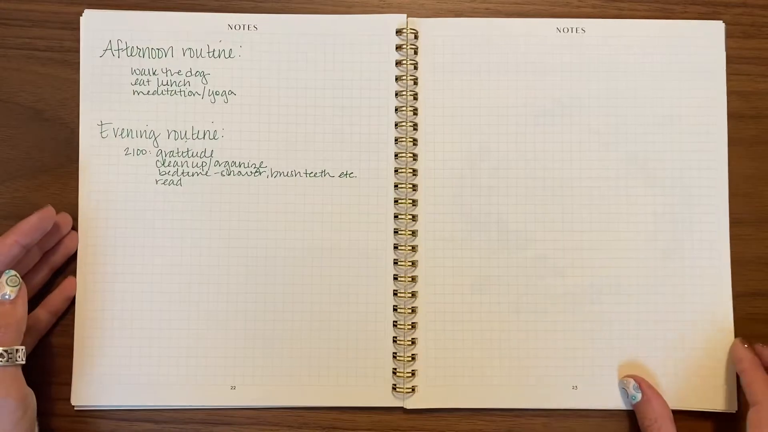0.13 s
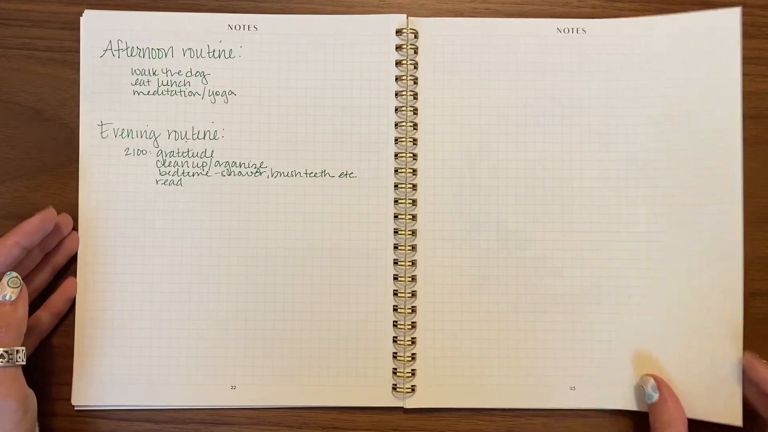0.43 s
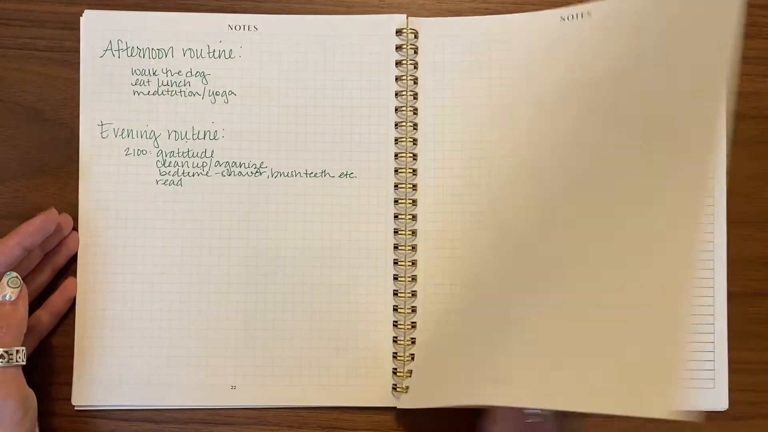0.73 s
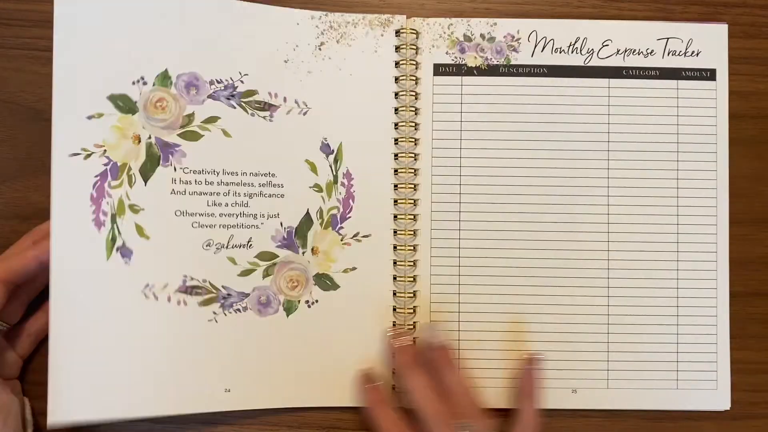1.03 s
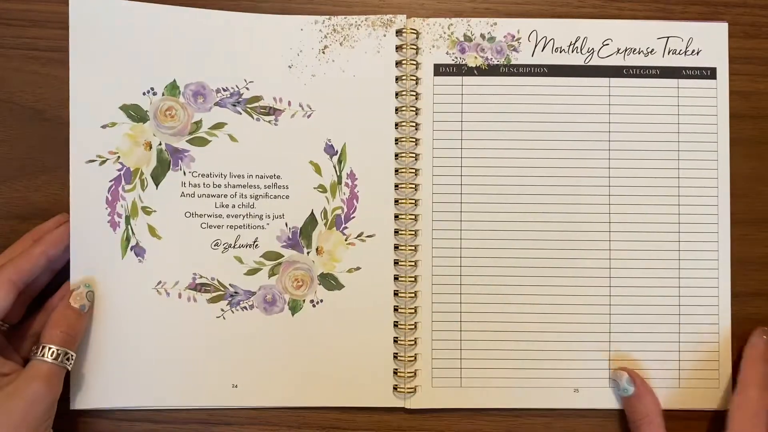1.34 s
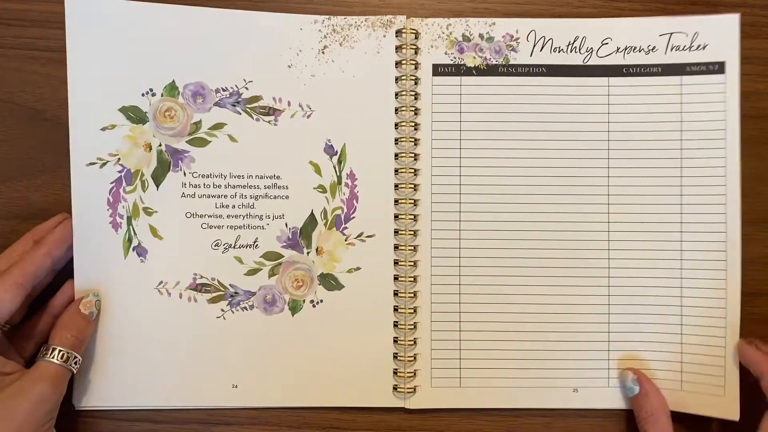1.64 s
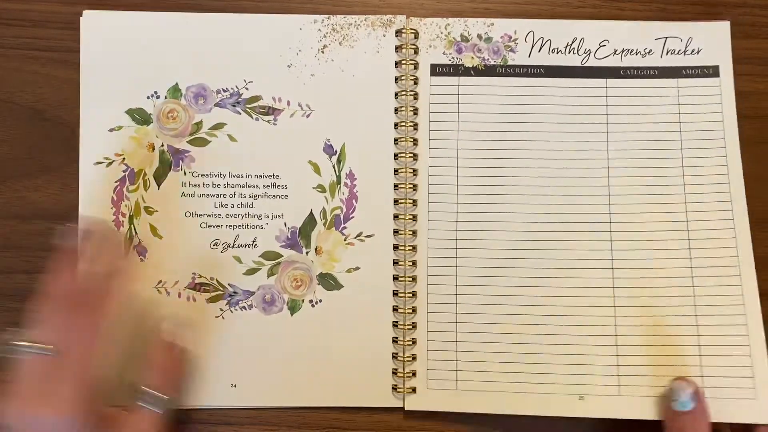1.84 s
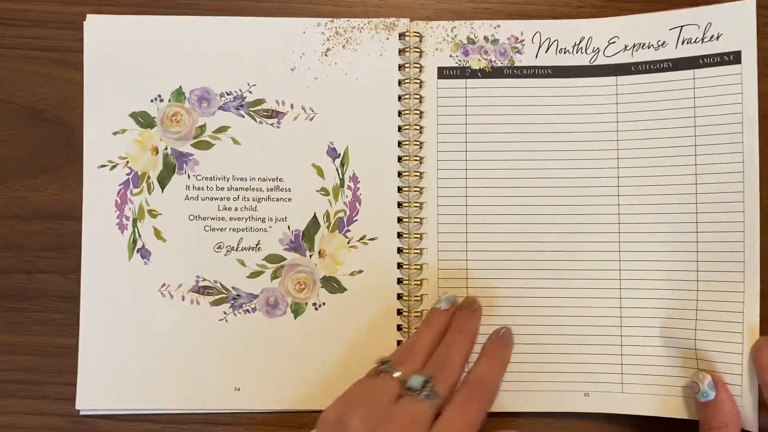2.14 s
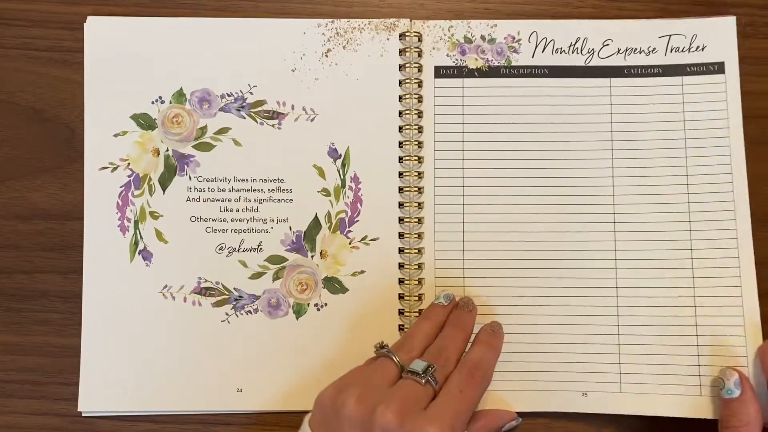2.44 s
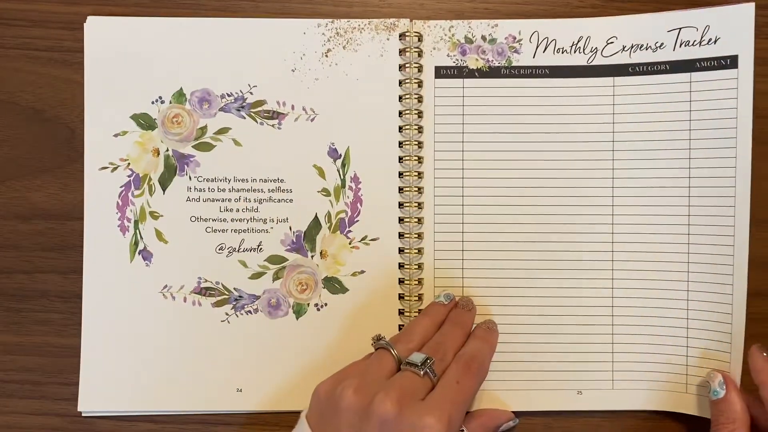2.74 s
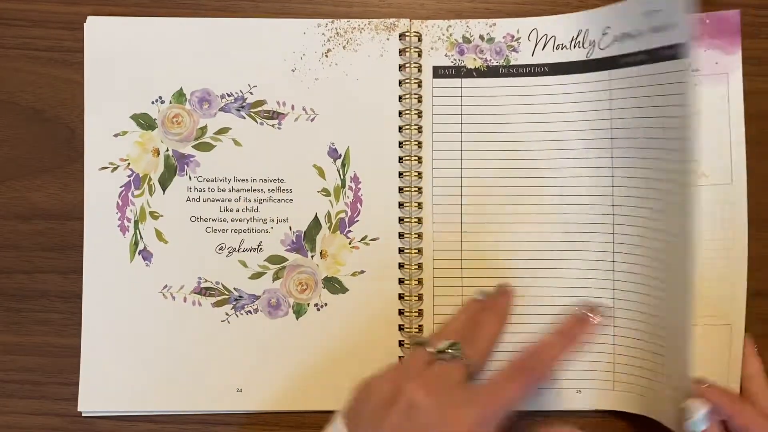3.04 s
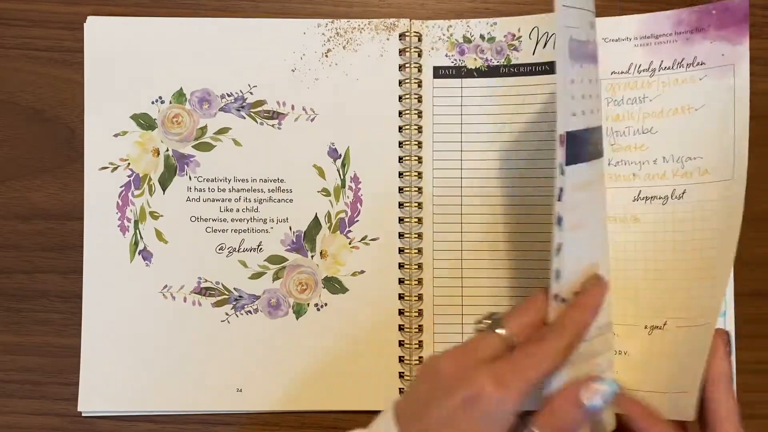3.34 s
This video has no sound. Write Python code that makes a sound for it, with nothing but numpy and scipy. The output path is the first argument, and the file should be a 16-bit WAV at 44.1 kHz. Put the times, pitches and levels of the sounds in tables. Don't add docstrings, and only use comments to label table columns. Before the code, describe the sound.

Notebook pages turned by hand, soft papery rustle and sliding fingers, ending in sharp hard flicks

```python
import sys
import numpy as np
from scipy import signal
from scipy.fft import rfft, irfft, next_fast_len
from scipy.io import wavfile
from scipy.ndimage import uniform_filter1d, map_coordinates

SR = 44100
rng = np.random.default_rng(int(sys.argv[2]) if len(sys.argv) > 2 else 0)


def how_loud(loudness_db):
    steps = np.asarray(loudness_db, float) / 20
    return 10 ** steps


def waveform_to_disk(signal):
    frames = np.transpose(np.atleast_2d(signal))
    scaled = np.clip(frames, -1, 1) * 32767
    samples = np.round(scaled).astype(np.int16)
    wavfile.write(sys.argv[1], SR, samples)


N = 154350

# f/Hz, level/dB per Hz
HUM_COLOUR = [(22, -25), (42, -2), (200, -3), (450, -5.5), (900, -17.5), (1300, -18), (1900, -45),
              (16000, -50)]
# f/Hz, width/Hz, level/dB
DRONES = [(43.7, 22, 3), (125, 21.5, 1), (178.6, 26, 5), (247.3, 6.6, 14.5), (313, 19.4, 1.5),
          (366.6, 21, -4), (8270, 140, 29.5)]
# f/Hz, correlation/1
HUM_LIKENESS = [(60, 0.25), (200, 0.93), (500, 0.17), (1500, 0.09), (8000, 0.33)]
# f/Hz, t60/s
WALL_DECAY = [(300, 0.24), (2000, 0.15), (6000, 0.25), (14000, 0.2)]
# t/s, level/dB, f/Hz, t60/s
THUDS = [
    (0.404, -36.5, 125, 0.093),
    (0.623, -31, 154, 0.087),
    (0.831, -37.5, 123, 0.19),
    (1.531, -45.5, 122.3, 0.39),
    (1.673, -31, 117, 0.078),
    (1.781, -46.5, 129, 0.51),
    (2.53, -38, 91, 0.069),
]
# t/s, rms level/dB, centre f/Hz, length/s
SCRAPES = [(0.38, -41.5, 4800, 0.017), (1.138, -48, 4800, 0.0058), (1.848, -40, 4800, 0.021),
           (2.736, -48, 4800, 0.15), (2.75, -48, 2100, 0.33), (2.861, -35, 3040, 0.028),
           (1.6, -66, 4900, .06), (1.1, -45.5, 4800, 0.049), (1.08, -56.5, 11200, .2),
           (2.849, -42, 2500, 0.01), (2.853, -38, 5560, .008), (1.3, -49, 9900, 0.015),
           (0.78, -55, 5900, 0.014), (.868, -51, 1120, 0.022), (1, -47, 2500, .016),
           (2.685, -65, 2100, 0.037)]
# t/s, level/dB, f/Hz, t60/s
RINGS = [(0.402, -32, 1710, 0.0075), (0.4047, -35, 930, .015), (0.41, -36, 1300, 0.0098),
         (.414, -30, 986, 0.015), (.924, -26, 830, 0.012), (0.9261, -30.5, 1560, 0.012),
         (1.6765, -32.5, 1360, 0.016), (1.678, -27.5, 1106, 0.0093), (1.6968, -35, 1170, 0.017),
         (2.525, -35, 1230, 0.0088), (2.529, -34.5, 856.2, 0.01), (2.5294, -32, 1560, 0.0088),
         (1.018, -45, 1900, 0.0094), (0.6282, -26, 1010, 0.0069), (0.633, -30.5, 1400, 0.0074),
         (.6355, -26, 770, 0.013), (0.6413, -28, 940, 0.0084), (0.647, -34, 990, 0.024),
         (0.812, -36, 3290, 0.0086), (1.0414, -14.5, 2530, 0.004), (1.041, -27, 5770, 0.0091),
         (1.0422, -36.5, 4740, .015), (1.0431, -32, 1480, 0.018), (1.047, -27.5, 1130, 0.01),
         (1.051, -36, 1110, 0.016), (1.054, -38, 684, 0.051), (2.8646, -13.5, 1720, 0.007),
         (2.8648, -13.5, 2190, 0.0046), (2.864, -24.5, 4720, 0.0094), (2.8654, -26.5, 5900, 0.0084),
         (2.869, -33.5, 2770, 0.022), (2.876, -37, 2160, 0.014), (2.937, -23.5, 1210, 0.0051),
         (2.945, -32.5, 1470, 0.017), (2.8645, -31.5, 832, 0.015), (1.684, -37, 864, 0.022),
         (3.1477, -4.5, 1940, 0.0069), (3.148, -16, 1085, 0.023), (3.1479, -8.5, 3820, 0.0071),
         (3.1474, -6.5, 5250, 0.0056), (3.1485, -8, 6315, 0.0077), (3.1563, -27, 2866, 0.045),
         (3.1564, -21, 5500, 0.014), (3.25, -39.5, 1040, 0.015), (3.2865, -26.5, 2060, .018),
         (3.292, -17, 2080, 0.006), (3.2918, -29, 1020, 0.011), (3.3025, -28, 880, 0.009)]
# crest t/s, peak level/dB (the puff peaks 7 dB
# higher), centre f/Hz, length/s
FLAPS = [(0.407, -37.5, 1290, 0.012), (0.433, -51.5, 696, 0.011), (0.574, -49, 1300, 0.04),
         (0.631, -40.5, 870, 0.011), (0.828, -40, 1100, 0.0064), (.875, -46, 690, 0.037),
         (0.889, -38, 980, 0.021), (0.928, -33.5, 900, 0.0073), (.945, -41.5, 850, 0.0094),
         (1.046, -36, 1050, 0.017), (1.06, -61, 970, 0.0057), (1.206, -53.5, 1810, 0.028),
         (1.68, -40.5, 1200, 0.018), (1.697, -40.5, 930, 0.0079), (2.02, -48.5, 910, 0.0096),
         (2.21, -49.5, 1160, 0.0064), (2.534, -41, 920, 0.0069), (2.939, -43, 1210, 0.006),
         (3.244, -48, 1320, 0.0066), (3.279, -35.5, 814.3, 0.014), (3.297, -32, 1120, 0.0035),
         (3.298, -33.5, 670, 0.0053), (2.797, -43, 2270, 0.28), (3.158, -42, 423, 0.013),
         (0.87, -39.5, 410, 0.051), (0.753, -45, 2180, 0.023)]
# t/s, skin hiss level/dB, sheet stir level/dB
SLIDE = [(0, -108, -75), (0.298, -84, -77), (0.346, -52.5, -57), (.6, -54.5, -62), (0.759, -58, -50.5),
         (.945, -53.5, -54), (.985, -66, -71), (1.06, -67, -72), (1.25, -52.5, -56.5), (1.42, -65.5, -67.5),
         (1.57, -73.5, -74.5), (1.601, -51, -63.5), (2.15, -54.5, -52), (2.448, -76.5, -61.5),
         (2.65, -65.5, -66.5), (2.76, -45.5, -59), (3.1, -54.5, -51.5), (3.45, -94, -55)]
# f/Hz, level/dB per Hz
SKIN_COLOUR = [(800, -31), (1500, -32.5), (3000, -11.5), (4300, -8.5), (6500, -8.5), (8500, -14.5),
               (12500, -12.5), (16000, -15)]
# f/Hz, level/dB
SHEET_COLOUR = [(250, -46), (500, -10), (900, -1), (2000, 0.5), (3500, -3.5), (7000, -9.5), (15000, -20)]
# t/s, peak level/dB, t60/s, treble level/dB
FLICKS = [(0.125, -35, 0.029, 8), (.347, -35, 0.081, -3), (0.389, -32, 0.19, 10), (0.549, -44.5, 0.25, 16),
          (1.195, -35.5, 0.14, 21), (1.912, -34.5, 0.11, 19), (2.3, -36.5, 0.23, 3), (2.506, -38, 0.31, 24),
          (0.6236, -27.5, 0.018, 16), (.811, -33, 0.068, -18), (.91, -33.5, 0.016, 4),
          (1.018, -39.5, 0.078, -8), (1.0414, -20.5, 0.017, 16), (1.136, -34.5, 0.044, 7),
          (1.388, -40.5, 0.063, 30), (1.592, -37, 0.48, 1), (1.67, -31.5, 0.075, 16),
          (1.849, -38, 0.51, 13), (2.2, -35.5, 0.1, 20), (2.289, -29, 0.022, -4), (2.365, -37, 0.11, 15),
          (2.8644, -14, 0.015, -4), (2.9334, -21, 0.045, -4), (2.9587, -21.5, 0.024, 14),
          (3.1474, -9.5, 0.027, 17), (3.154, -18, 0.1, -8), (.874, -38, 0.012, 14),
          (3.249, -27.5, 0.038, -2), (3.2856, -21, 0.018, 12)]
# f/Hz, width/Hz, level/dB
CORNER_MODES = [(1080, 270, 4.5), (2090, 310, 1), (2440, 430, -13), (3745, 310, 0), (5000, 810, -9),
                (5990, 520, -1), (7340, 410, 3), (8300, 730, -24), (11600, 500, -15)]
# f/Hz, phase/rad
PORT_LEAD = [(0, 0), (1700, 0), (2750, 1.4), (3300, 1), (4200, 1.5), (5100, .15), (6950, 2.95),
             (8000, 3.35), (9700, 6.1), (11000, 6.45), (12950, 9.25), (14200, 9.6), (15500, 11.8)]


def unit(x):
    return x / np.sqrt(np.mean(x ** 2) + 1e-20)


def along(points, hz):
    f, v = np.transpose(points)
    return np.interp(np.log(hz + 1), np.log(f + 1), v)


def wobble(rate):
    knots = rng.standard_normal(int(N * rate / SR) + 4)
    return map_coordinates(knots, [np.arange(N) * rate / SR])


def filtered(x, response):
    n = x.shape[-1]
    m = next_fast_len(n + 8192)
    return irfft(rfft(x, m) * response(np.fft.rfftfreq(m, 1 / SR)), m)[..., :n]


def peak(f, hz, width):
    return 1j * f * width / (hz * hz - f * f + 1j * f * width)


def add(into, x, s):
    part = into[max(round(s * SR), 0):][:len(x)]
    part += x[:len(part)]


def hum():
    def colour(f):
        drones = sum(how_loud(db) * abs(peak(f, hz, width)) ** 2 for hz, width, db in DRONES)
        return how_loud(along(HUM_COLOUR, f)) * (1 + drones)

    def spread(f):
        angle = np.arccos(np.clip(along(HUM_LIKENESS, f), -1, 1)) / 2
        return colour(f) * np.array([np.cos(angle), np.sin(angle)])

    mid, side = filtered(rng.standard_normal((2, N)), spread)
    return how_loud(-47.5 + 1.25 * wobble(4.75)) * unit(np.array([mid + side, mid - side]))


def walls(x):
    overhead_db, sides_db, delay_s = -13, -6.5, 0.007
    hz, t, z = signal.stft(rng.standard_normal((3, SR // 2)), SR, nperseg=256)
    decay = how_loud(-60 * t / along(WALL_DECAY, hz)[:, None])
    tail = signal.istft(z * decay, SR, nperseg=256)[1]
    tail = tail / np.linalg.norm(tail[0])
    late = np.pad(x, (round(delay_s * SR), 0))
    wet = signal.fftconvolve(late[None], tail, axes=1)[:, :N]
    return how_loud(overhead_db) * wet[0] + how_loud(sides_db) * wet[1:]


def ringing(events, length, rise_s, gain):
    out, t = np.zeros(N), np.arange(length) / SR
    for s, db, hz, t60 in events:
        envelope = how_loud(db - 60 * t / t60) * (1 - np.exp(-t / rise_s))
        add(out, gain * envelope * np.sin(2 * np.pi * hz * t), s)
    return out


def thuds():
    return ringing(THUDS, SR // 2, rise_s=0.023, gain=3)


def scrapes():
    out, t = np.zeros(N), np.arange(SR // 4) / SR
    for s, db, hz, length in SCRAPES:
        hiss = unit(filtered(rng.standard_normal(len(t)), lambda f: peak(f, hz, 0.22 * hz) ** 2))
        rise = 1 - np.exp(-t / (0.12 * length))
        add(out, how_loud(db) * hiss * rise * np.exp(-(t / length) ** 2), s)
    return out


def rings():
    return ringing(RINGS, SR // 8, rise_s=0.00044, gain=2)


def flaps():
    out, t = np.zeros(N), np.arange(-SR // 10, SR // 5) / SR
    for s, db, hz, length in FLAPS:
        hollow = lambda f: peak(f, hz, hz) * peak(f, hz, 4.86 * hz) ** 2
        puff = filtered(rng.standard_normal(len(t)), hollow)
        puff = puff * how_loud(2 * wobble(150.45)[:len(t)])
        rise = np.exp(-(t / (0.71 * length)) ** 2)
        fall = np.exp(-abs(t) / length)
        puff = puff * np.where(t < 0, rise, fall)
        add(out, how_loud(db + 7) * puff / abs(puff).max(), s + t[0])
    return out


def friction():
    grains_per_s, spread_db, grain_share = 2500, 2.2, 0.3
    z = signal.stft(rng.standard_normal(N + 512), nperseg=256)[2]
    patches = uniform_filter1d(rng.standard_normal(z.shape), size=5, axis=0)
    patches = uniform_filter1d(patches, size=9, axis=1)
    smooth = signal.istft(z * how_loud(3.8 * unit(patches)), nperseg=256)[1][:N]
    chance, sign, size = rng.random((3, N))
    grains = (chance < grains_per_s / SR) * np.sign(sign - 0.5) * how_loud(-spread_db * np.log(size + 1e-4))
    return np.sqrt(1 - grain_share) * unit(smooth) + np.sqrt(grain_share) * unit(grains)


def sliding():
    s, skin_db, sheet_db = np.transpose(SLIDE)
    t, shared = np.arange(N) / SR, 1.3 * wobble(6.6)
    ridges = lambda f: 1 + how_loud(8) * abs(peak(f, 5200, 450))
    skin = unit(filtered(friction(), lambda f: how_loud(along(SKIN_COLOUR, f)) * ridges(f)))
    sheet = unit(filtered(friction(), lambda f: how_loud(along(SHEET_COLOUR, f))))
    skin_level = np.interp(t, s, skin_db) + shared + 1.9 * wobble(33.93)
    sheet_level = np.interp(t, s, sheet_db) + shared + 2.6 * wobble(22)
    return skin * how_loud(skin_level) + sheet * how_loud(sheet_level)


def flicks():
    crack_s, crack_db, crisp_s = 0.00073, 14.5, 0.037
    out, t = np.zeros(N), np.arange(SR // 8) / SR
    for s, db, t60, treble_db in FLICKS:
        detune = np.exp(0.02 * rng.standard_normal(len(CORNER_MODES)))
        dying = max(t60, 0.004)
        burst = rng.standard_normal(len(t)) * how_loud(-60 * t / dying)
        burst = burst * (1 - np.exp(-t / (0.013 * dying)))
        burst[round(crack_s * SR)] += how_loud(crack_db) * min(crisp_s / dying, 1)

        def corner(f):
            body = how_loud(-8) * peak(f, 2700, 6500)
            for k, (hz, width, mode_db) in enumerate(CORNER_MODES):
                body = body + (-1) ** k * how_loud(mode_db) * peak(f, hz * detune[k], width)
            treble = 1 + how_loud(treble_db) * 1j * f / 3720 * peak(f, 2500, 6400) * peak(f, 2800, 12000)
            return body * treble

        def snapped(f):
            body = how_loud(-8) * peak(f, 2700, 6500)
            for k, (hz, width, mode_db) in enumerate(CORNER_MODES):
                body = body + (-1) ** k * how_loud(mode_db) * peak(f, hz * detune[k], width)
            tilt = 1 + how_loud(treble_db) * 1j * f / 3720
            return body * tilt * peak(f, 2500, 6400) * peak(f, 2800, 12000)

        snap = filtered(burst, snapped)
        add(out, how_loud(db) * snap / abs(snap).max(), s)
    return out


def scene():
    ring = rings()
    paper = sliding() + flicks() + flaps()
    echoes = walls(paper + how_loud(-6) * ring)
    return paper + ring + thuds() + echoes + hum() + scrapes()


def top_cut(x):
    return signal.sosfilt(signal.butter(12, 17100, fs=SR, output="sos"), x)


def record(dry):
    top_hz, side_db, diffuse_db = 15850, -1, -9
    both, apart = (dry[0] + dry[1]) / 2, (dry[0] - dry[1]) / 2
    half_lead = lambda f: np.interp(f, *np.transpose(PORT_LEAD)) / 2
    mid = filtered(both, lambda f: np.cos(half_lead(f)) * (f < top_hz))
    side = filtered(both + how_loud(diffuse_db) * apart,
                    lambda f: 1j * how_loud(side_db) * np.sin(half_lead(f)) * (f < top_hz))
    side = side + filtered(apart, lambda f: peak(f, 1520, 4300))
    return top_cut(np.array([mid + side, mid - side]))


dry = scene()
out = record(dry)
waveform_to_disk(out)
```